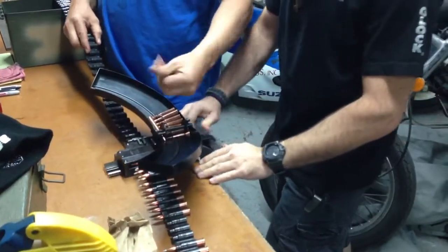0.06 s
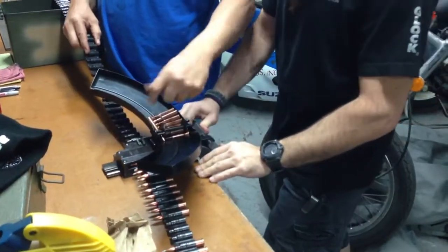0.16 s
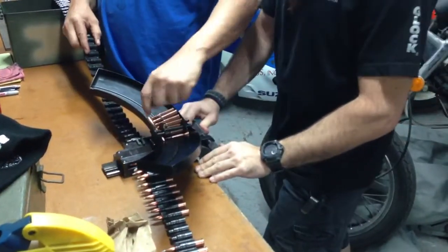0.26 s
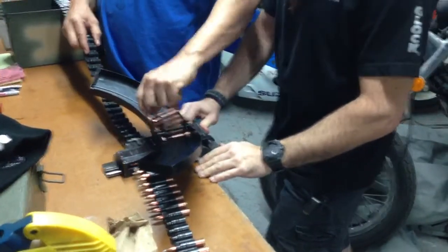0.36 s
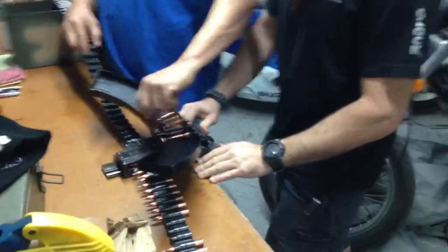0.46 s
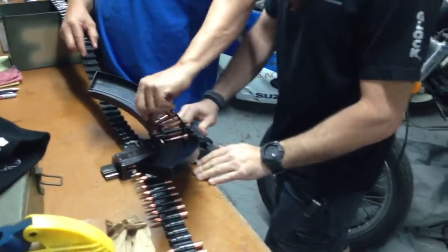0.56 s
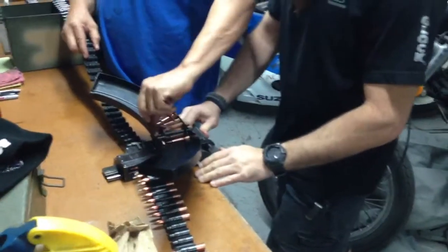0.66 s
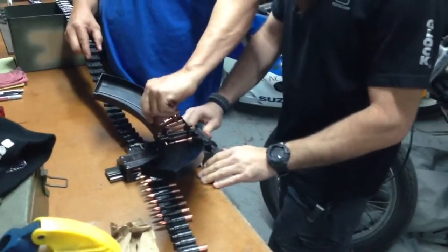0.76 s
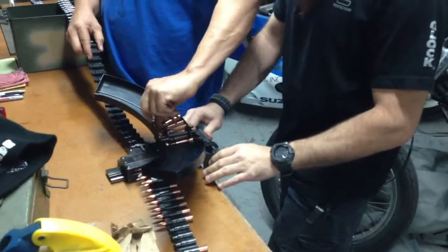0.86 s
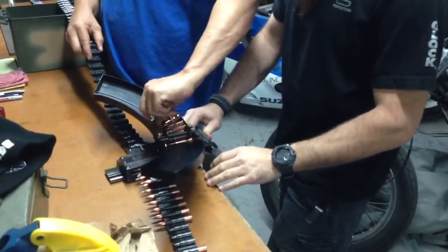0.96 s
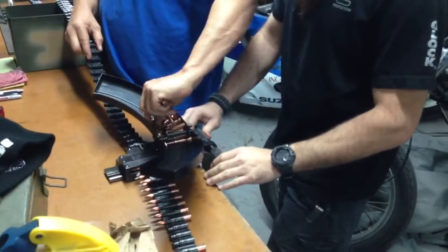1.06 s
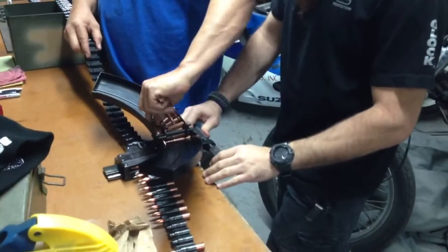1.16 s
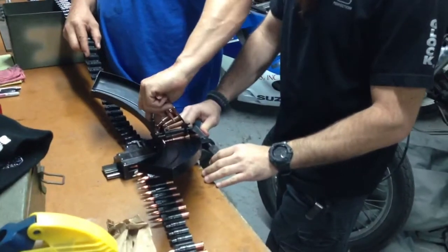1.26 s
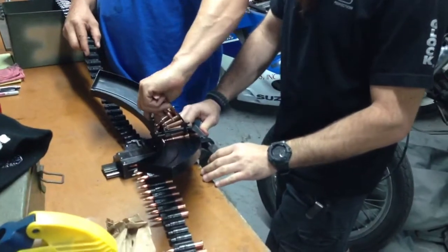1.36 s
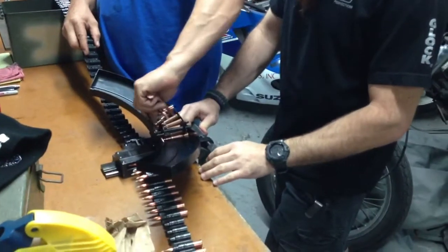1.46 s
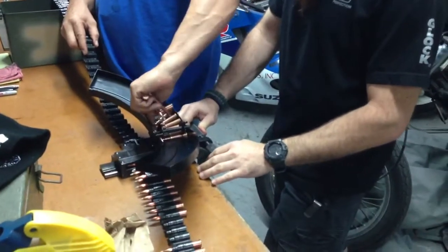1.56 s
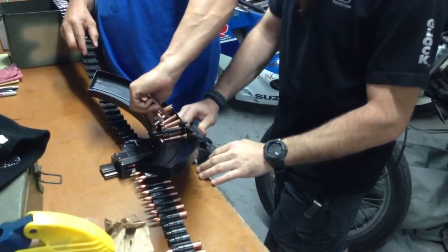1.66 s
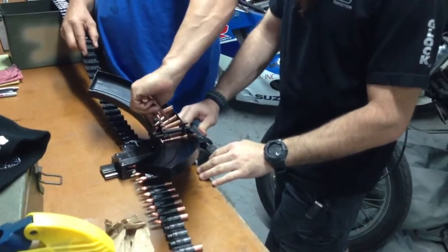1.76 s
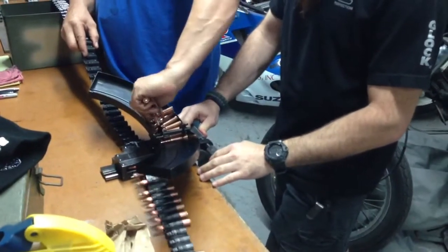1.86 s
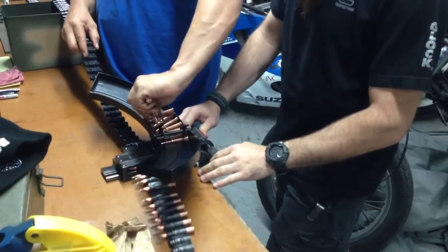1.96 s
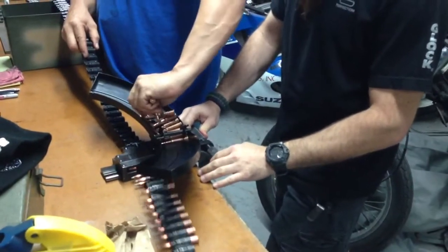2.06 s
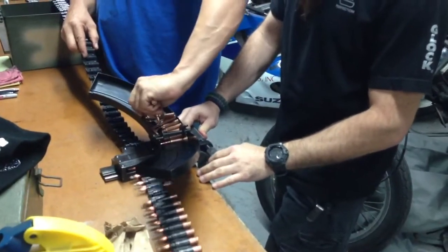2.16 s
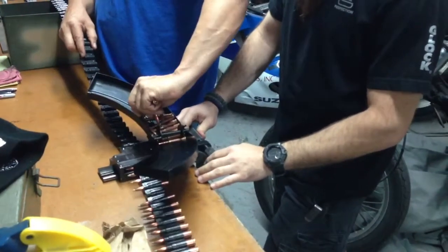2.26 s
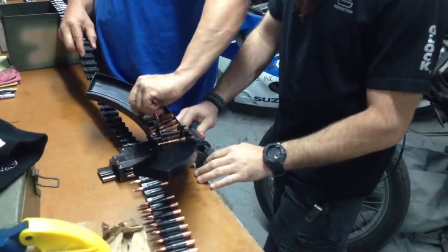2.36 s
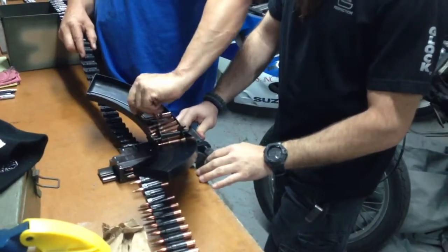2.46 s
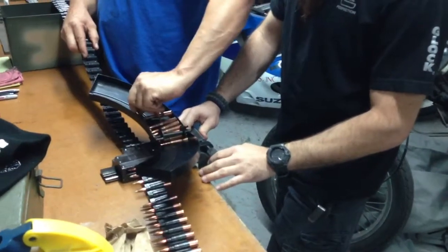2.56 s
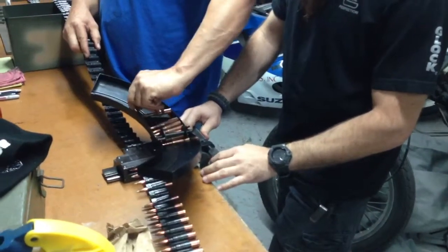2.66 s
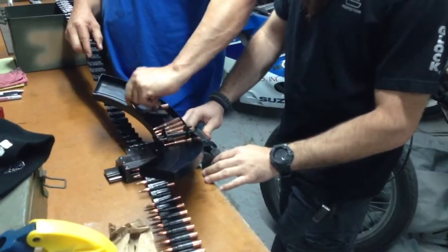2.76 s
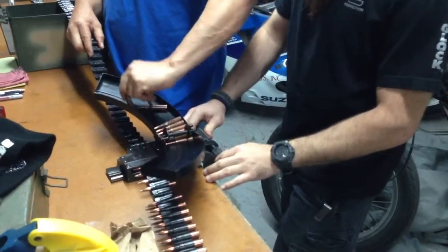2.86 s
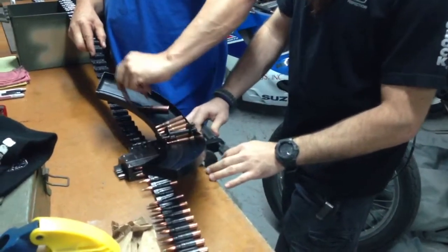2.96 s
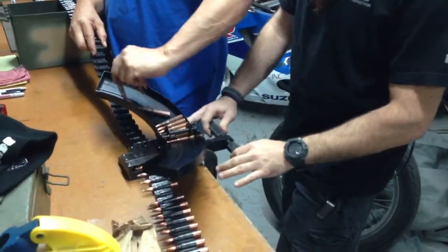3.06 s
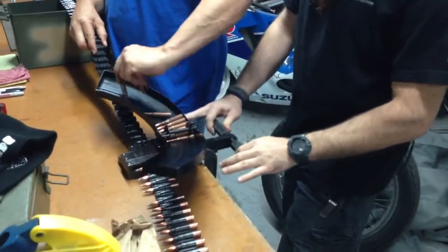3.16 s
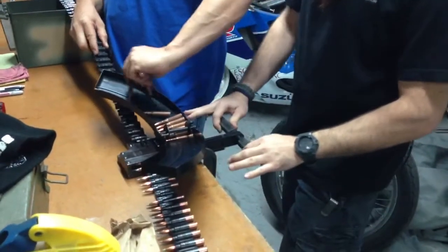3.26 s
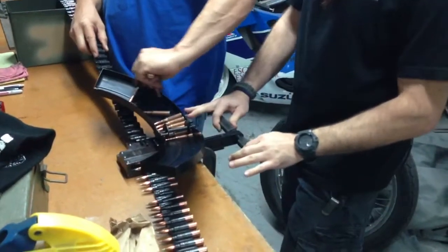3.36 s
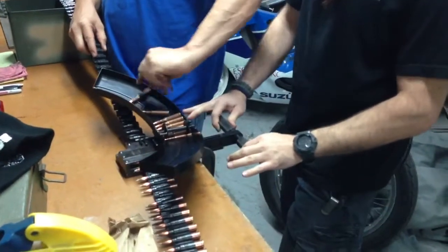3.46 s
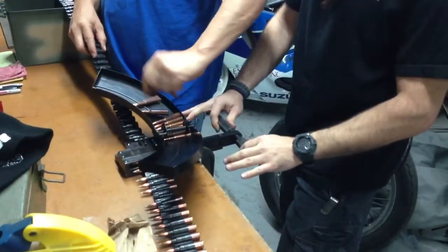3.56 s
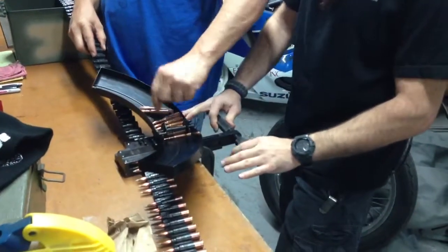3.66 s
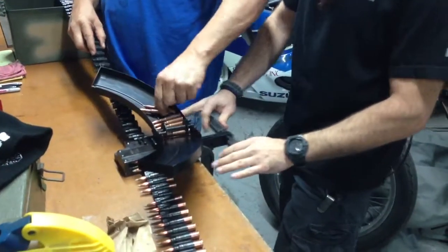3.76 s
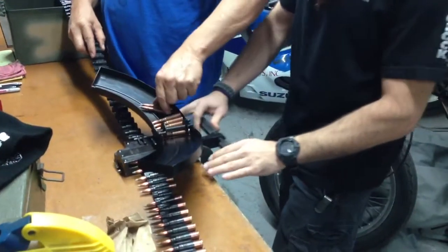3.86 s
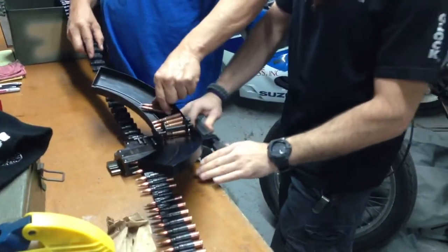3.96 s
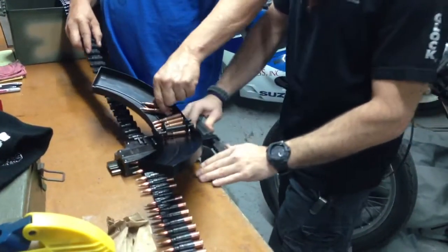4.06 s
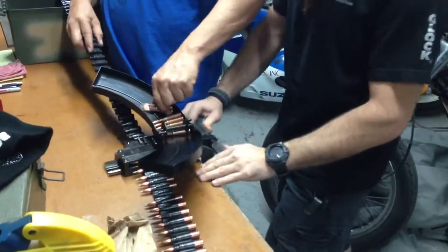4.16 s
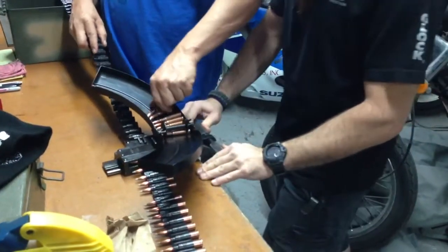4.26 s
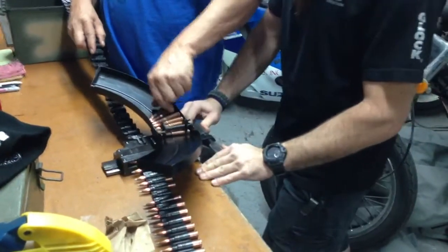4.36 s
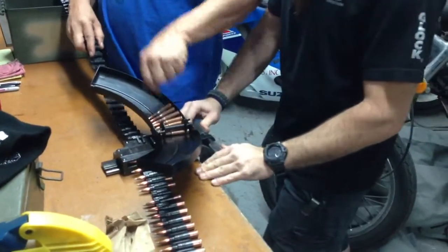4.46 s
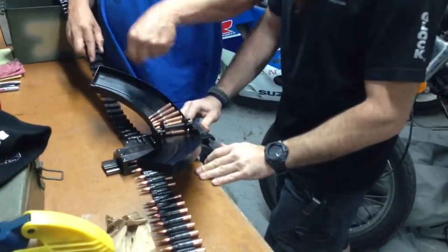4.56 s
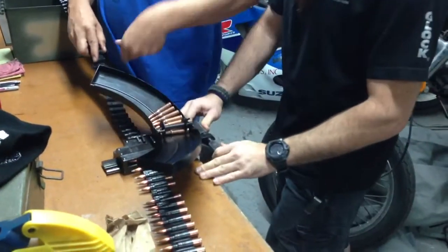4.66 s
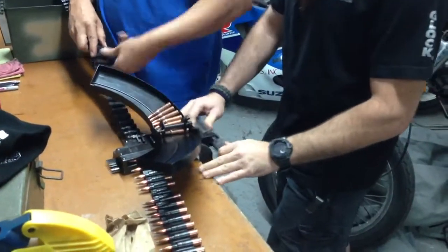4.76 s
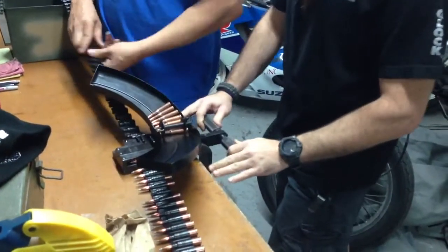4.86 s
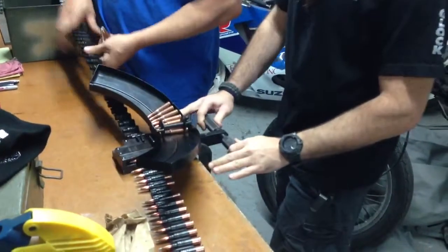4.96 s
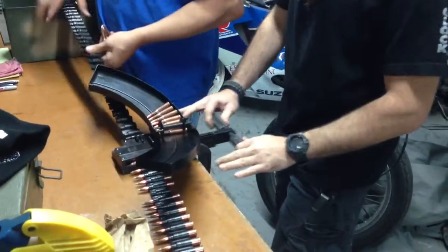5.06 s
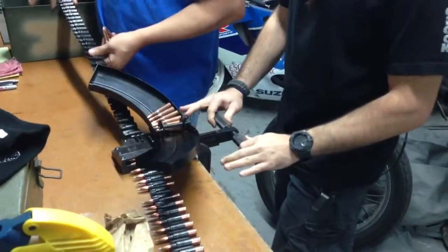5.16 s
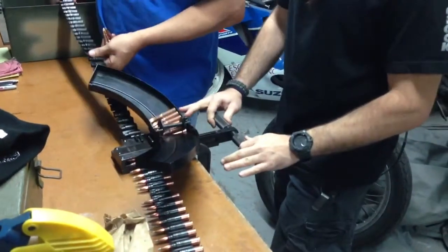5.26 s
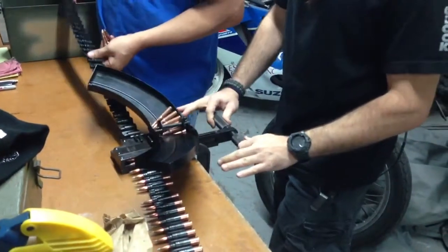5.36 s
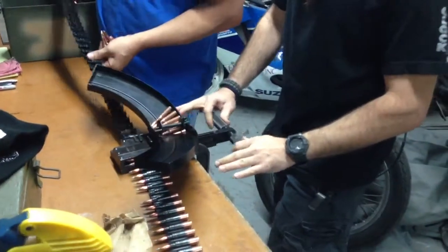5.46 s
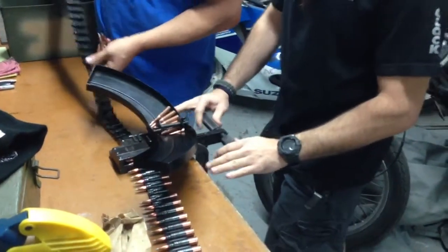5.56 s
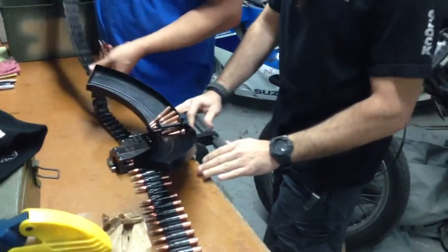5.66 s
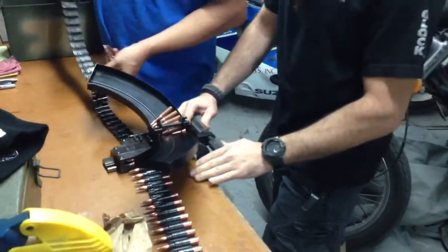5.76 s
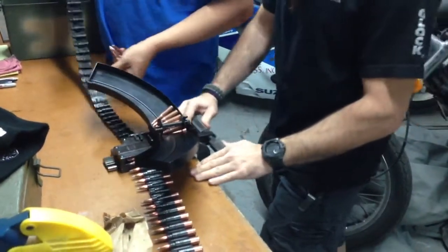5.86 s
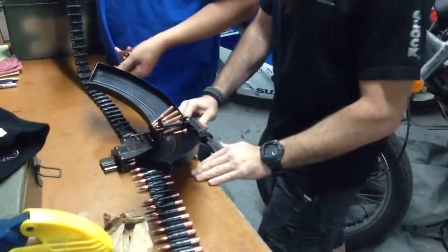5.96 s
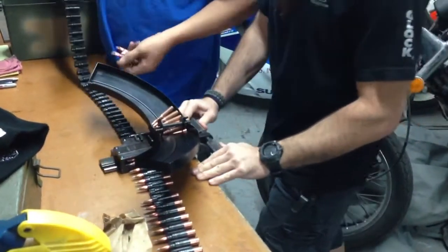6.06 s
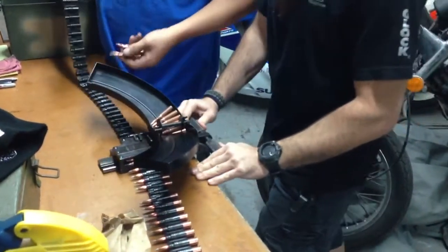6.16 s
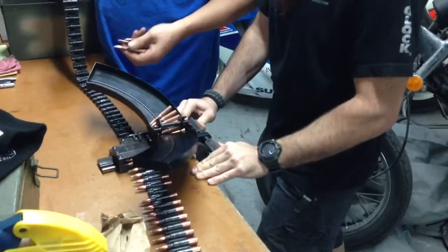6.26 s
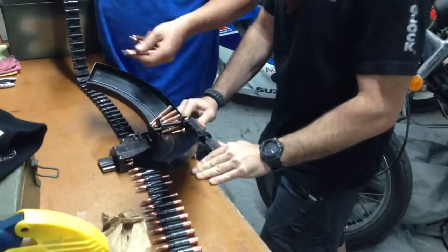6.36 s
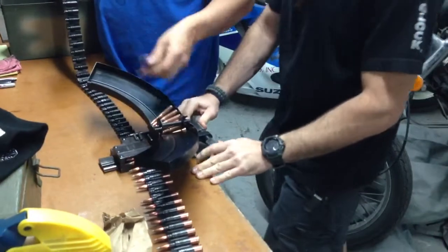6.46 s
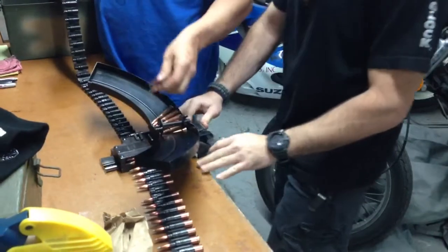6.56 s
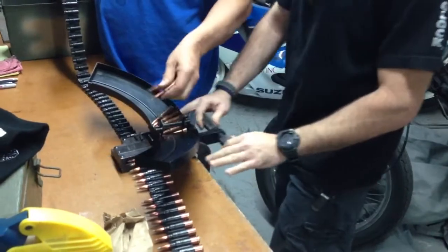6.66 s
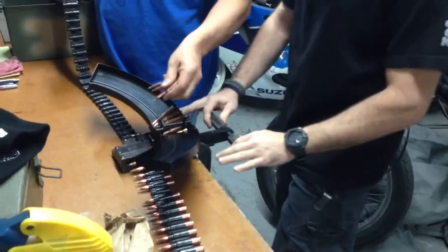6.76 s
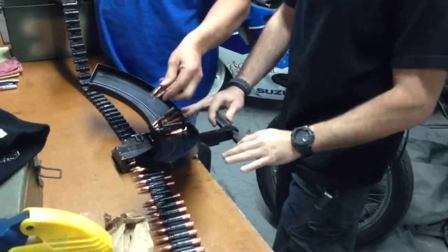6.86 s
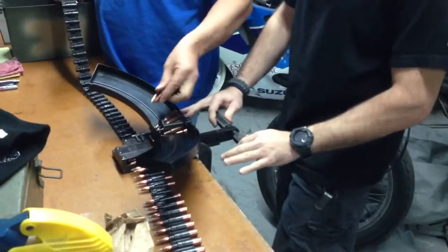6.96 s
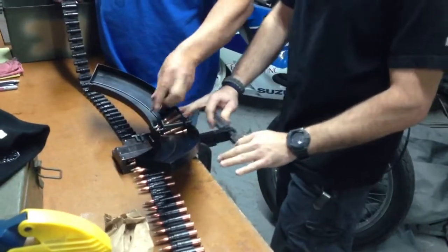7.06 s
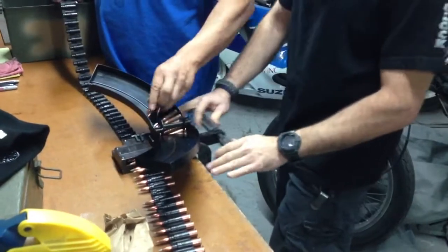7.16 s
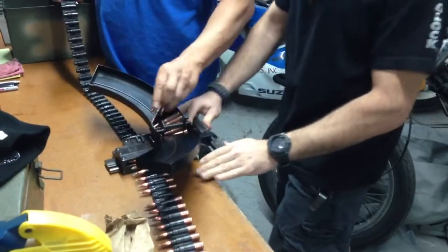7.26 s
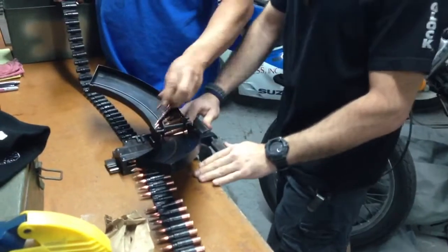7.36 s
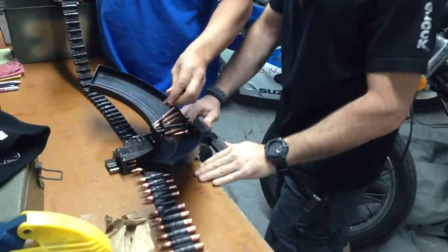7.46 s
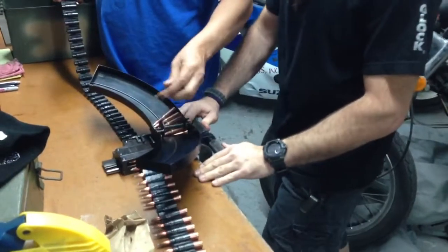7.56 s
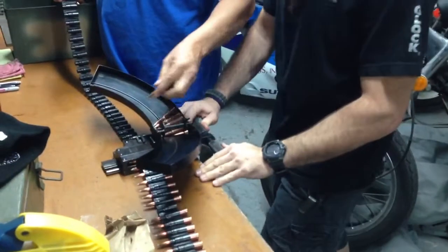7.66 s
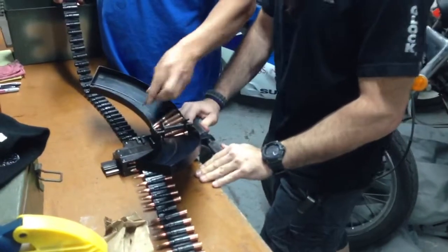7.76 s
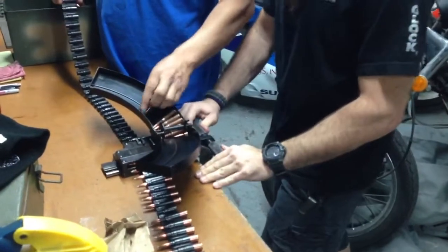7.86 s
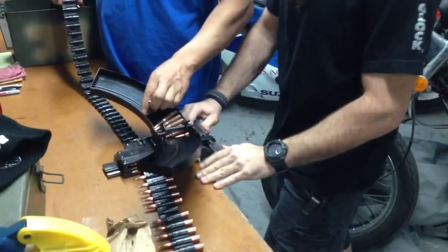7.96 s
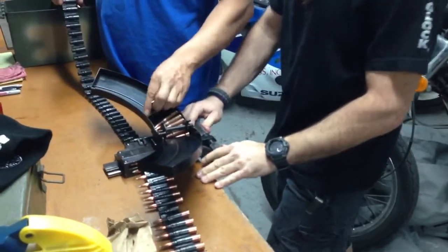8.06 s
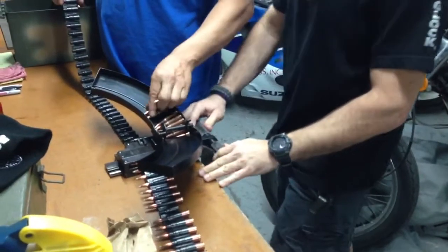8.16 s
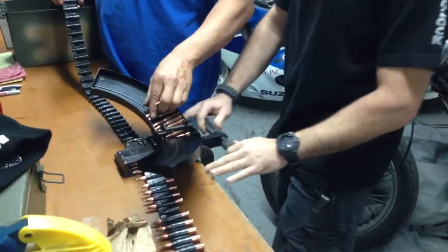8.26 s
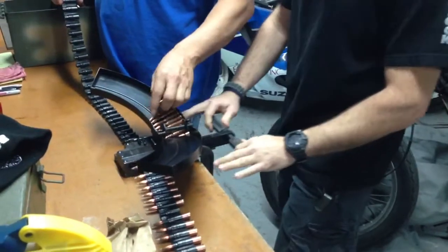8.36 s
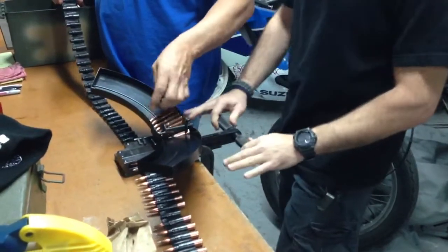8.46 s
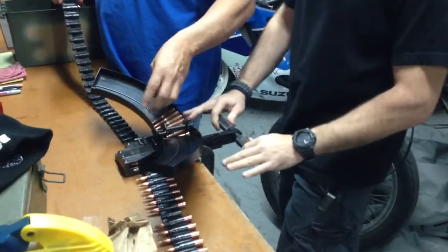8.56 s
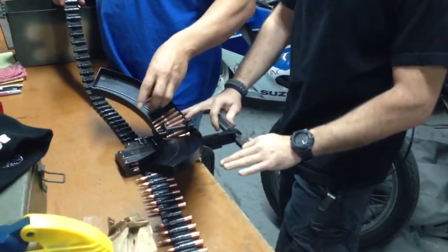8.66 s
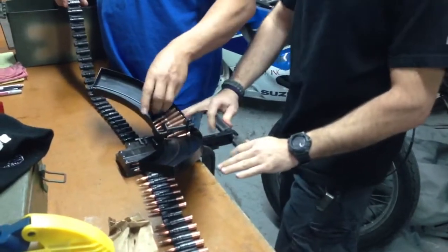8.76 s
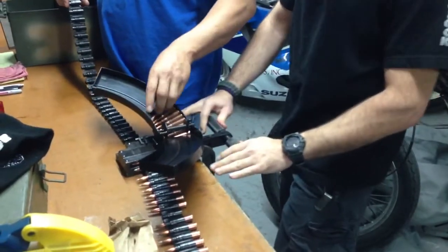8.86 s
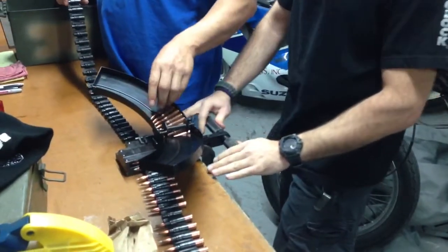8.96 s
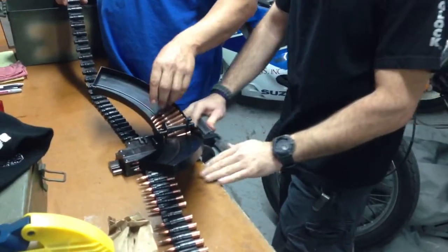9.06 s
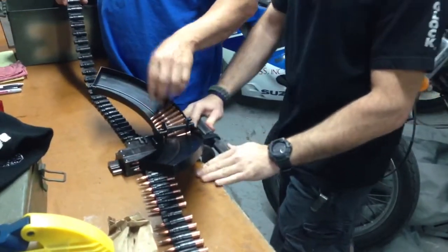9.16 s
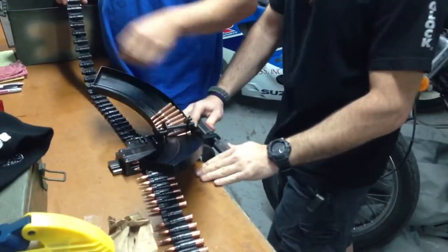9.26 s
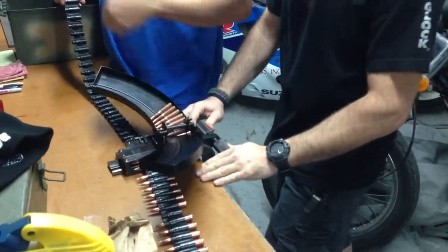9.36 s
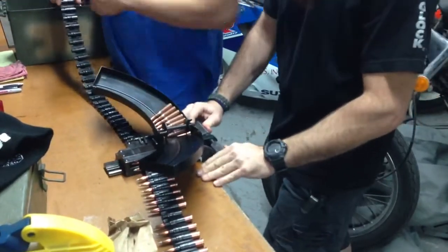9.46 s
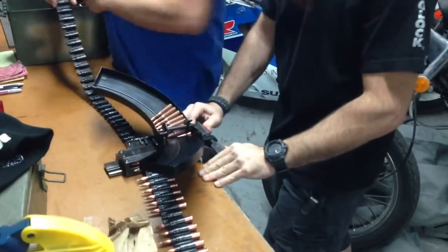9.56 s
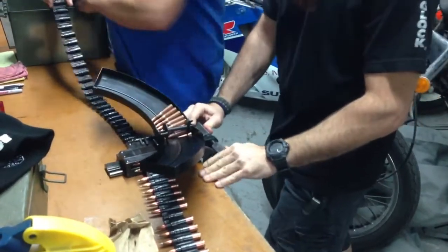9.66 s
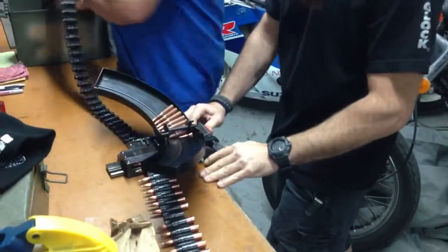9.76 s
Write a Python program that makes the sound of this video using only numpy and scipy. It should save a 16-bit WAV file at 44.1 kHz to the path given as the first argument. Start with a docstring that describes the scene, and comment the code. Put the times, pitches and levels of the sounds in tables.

```python
"""Faint brass clinks and light knocks over quiet workshop air, then a hand-cranked belt loader at work on a bench.
Cartridges drop into its steel tray, a pawl snaps, the crank knocks at its stop, cases clink and the belt drags.
Struck parts are decaying sines and noise through resonant bodies; the sliding belt is gritty noise and small ticks.
A hard-walled room answers in noise tails; the microphone signal loses its deep bass and has its peaks squeezed."""
import sys
import numpy as np
from scipy import signal
from scipy.fft import rfft, irfft, next_fast_len
from scipy.io import wavfile
from scipy.ndimage import map_coordinates

SR = 44100
rng = np.random.default_rng(int(sys.argv[2]) if len(sys.argv) > 2 else 0)


def transcribe(u):
    """Save the signal u as a 16-bit wav file named by the first command-line argument.

    u: samples, shape (n,) or (channels, n), limited to [-1, 1]; the rate is SR.
    q: integer samples, one column per channel.
    """
    v = np.clip(np.atleast_2d(u).T, -1, 1)
    q = np.round(v * 32767).astype(np.int16)
    wavfile.write(sys.argv[1], SR, q)


N = 431723  # length [samples]

# Modes of the wooden bench: (frequency [Hz], level [dB], t60 [s])
BENCH = [(174, -3.5, 0.054), (230.4, 0, 0.033), (292, 8, 0.012), (366, -3.5, 0.073), (461, -7, 0.08),
         (550, 0, 0.025), (671, 2, 0.031)]
# Modes of the loader housing: (frequency [Hz], level [dB], t60 [s])
HOUSING = [(1184, -0.5, 0.06), (1357, 0, 0.046), (1570, 3.5, 0.03), (1853, 3.5, 0.0081), (2128, 2, 0.052),
           (2534, 7.5, 0.02)]
# Modes of the steel tray: (frequency [Hz], level [dB], t60 [s])
TRAY = [(3622, -1, 0.04), (3874, 0, 0.034), (4130, 3, 0.012), (4454, 3, 0.039), (4866, -0.5, 0.022),
        (5860, -0.5, 0.053)]
# Highest modes of the tray: (frequency [Hz], level [dB], t60 [s])
TRAY_TOP = [(6600, 0.5, 0.038), (7230, -10.5, 0.039), (8100, -1.5, 0.027), (9620, -14, .02)]


def amp(db):
    """Decibels to gain."""
    return 10 ** (np.asarray(db) / 20)


def unit(x):
    """Scale to rms 1."""
    return x / np.sqrt(np.mean(x ** 2) + 1e-20)


def along(points, hz):
    """Interpolate (Hz, value) points on a log frequency axis."""
    f, v = np.transpose(points)
    return np.interp(np.log(hz + 1), np.log(f + 1), v)


def wobble(rate):
    """A smooth random curve with rate knots a second."""
    knots = rng.standard_normal(int(N * rate / SR) + 4)
    return map_coordinates(knots, [np.arange(N) * rate / SR])


def filtered(x, response):
    """Multiply the spectrum of x by a response of frequency."""
    m = next_fast_len(len(x) + SR // 2)
    return irfft(rfft(x, m) * response(np.fft.rfftfreq(m, 1 / SR)), m)[:len(x)]


def body(broad, modes, ring_db):
    """Causal impulse response, energy 1, of resonances standing on a broad spectrum."""
    size = 8192
    hz = np.fft.rfftfreq(size, 1 / SR)
    width = lambda t60: np.log(1000) / np.pi / t60  # a mode that dies fast is wide
    peaks = sum(amp(db) ** 2 / (1 + (2 * (hz - c) / width(t60)) ** 2) for c, db, t60 in modes)
    gain = amp(along(broad, hz)) * np.sqrt(1 + amp(ring_db) ** 2 * peaks)
    cepstrum = irfft(np.log(gain + 1e-6))
    cepstrum[1:size // 2] *= 2  # folding the cepstrum makes the phase minimal
    cepstrum[size // 2 + 1:] = 0
    h = irfft(np.exp(rfft(cepstrum)))[:size // 2]
    return h / np.linalg.norm(h)


def parts():
    """Impulse responses of the bench, housing, tray and tray top, which sound when struck or rubbed."""
    # Broad spectrum under the bench modes: (frequency [Hz], relative density [dB per Hz])
    bench_broad = [(90, -44.5), (160, 2.5), (250, 1.5), (450, 1.5), (700, -2), (1500, -45.5)]
    # Under the housing modes: (frequency [Hz], relative density [dB per Hz])
    housing_broad = [(350, -28), (900, -2), (1500, 0), (2200, -3), (3200, -10), (6000, -28)]
    # Under the tray modes: (frequency [Hz], relative density [dB per Hz])
    tray_broad = [(1500, -10.5), (3000, 8), (4500, 7.5), (5800, 6), (10000, -29.5)]
    # Under the highest tray modes: (frequency [Hz], relative density [dB per Hz])
    top_broad = [(3500, -24), (6800, 3), (10000, -4), (14500, -12), (16000, -42)]
    return [body(bench_broad, BENCH, ring_db=-14.0), body(housing_broad, HOUSING, ring_db=-1.5),
            body(tray_broad, TRAY, ring_db=0.0), body(top_broad, TRAY_TOP, ring_db=1.5)]


def workshop_air():
    """Steady noise shaped to the spectrum of the workshop background."""
    # Spectrum of the background: (frequency [Hz], relative density [dB per Hz])
    air_spectrum = [(15, -20.5), (25, 11), (64, 8), (180, 13), (354, 0.5), (624, 0.5), (1740, 1),
                    (5570, -5.5), (6210, -6.5), (14800, -13.5), (16000, -47)]
    noise = rng.standard_normal(N)
    return amp(-63.5) * unit(filtered(noise, lambda hz: amp(along(air_spectrum, hz))))


def room(x):
    """Each band of the walls' answer dies at its own speed; a fresh noise tail for every short stretch."""
    # Reverberation of the hard walls: (frequency [Hz], t60 [s])
    wall_decay = [(150, 0.1), (500, 0.99), (2000, 0.79), (6000, 0.51), (14000, 0.18)]
    hop = SR // 8
    out = np.zeros(N + 3 * SR)
    for k in range(0, N, hop):
        hz, t, z = signal.stft(rng.standard_normal(SR), SR, nperseg=256)
        fade = amp(-60 * t / along(wall_decay, hz)[:, None])
        tail = signal.istft(z * fade, SR, nperseg=256)[1]
        wet = signal.fftconvolve(x[k:k + hop], tail / np.linalg.norm(tail))
        out[k + 300:][:len(wet)] += wet  # the walls answer 300 samples late
    return out[:N]


def jingle():
    """The hanging belt is jolted: many links ring together in a few blurred bands that fade slowly."""
    # Jolts of the belt: (time [s], level [dB])
    jolts = [(5.945, -35)]
    # Bands of the ringing links: (frequency [Hz], width [Hz], level [dB])
    link_bands = [(1780, 380, 0), (2170, 120, -2), (2920, 260, -3), (3250, 350, -3), (4100, 700, -8)]
    t60_s = 0.95
    t = np.arange(N) / SR
    bands = lambda f: np.sqrt(sum(amp(db) ** 2 / (1 + (2 * (f - hz) / width) ** 4)
                                  for hz, width, db in link_bands))
    fade = sum((t > s) * amp(db - 60 * (t - s).clip(0) / t60_s) for s, db in jolts)
    flicker = amp(2.5 * wobble(40))
    return fade * flicker * unit(filtered(rng.standard_normal(N), bands))


def sliding():
    """Gain of each part over time: a slide rises up to its start, holds for its length and falls away."""
    # Belt and cartridges sliding:
    # (time [s], length [s], scrape level [dB], bench share [dB], hiss share [dB])
    slides = [(0, 0.031, -63, -8, 7.5), (0.73, 0.49, -64.5, -0.5, 0.5), (1.53, 0.04, -62, 8, -20),
              (1.68, .05, -62, 9.5, -20), (1.884, 0.069, -45.5, 5, -14), (1.99, 0.28, -40, 2, -14),
              (2.734, 0.42, -53.5, -11.5, 2), (3.058, 0.41, -43.5, -7, -7.5),
              (3.523, 0.18, -45.5, -16, -1.5), (3.744, 0.36, -51, -12, 3.5),
              (4.245, 0.018, -38.5, -19, -19), (4.3, 0.094, -44, -25, -9), (4.85, 0.068, -51, -6, -11.5),
              (5.152, 0.0065, -43.5, 9, -12), (5.193, 0.089, -40.5, -3, 4.5), (5.49, 0.11, -33, -16, -6),
              (5.606, 0.078, -30.5, -7, -4), (5.952, 0.048, -42, -8, -3), (6.11, 0.072, -60, -20, 0),
              (6.69, 0.24, -46, -6, -10.5), (6.914, 0.061, -35.5, -5.5, -0.5), (7.118, 0.28, -52, -9, 8.5),
              (7.355, 0.24, -51, 6, -6), (8.05, 0.26, -64, -42, 14), (8.338, 0.23, -45, -7.5, -1.5),
              (8.51, 0.16, -41.5, -4.5, -9.5), (8.77, 0.23, -45, -23.5, -1), (9.78, .05, -48.5, 1, 1)]
    # Small movements that never stop, one level per part, low to high: level [dB]
    rest_levels = [-69, -84.5, -74, -77.5]
    rise_db_per_s, fall_db_per_s = 219.5, 97.5
    t = np.arange(0, N, 64) / SR
    s, length, db, bench_db, hiss_db = np.transpose(slides)[:, :, None]
    shape_db = db - rise_db_per_s * (s - t).clip(0) - fall_db_per_s * (t - s - length).clip(0)
    top_db = -8.5 + 1.22 * hiss_db  # the top of the hiss follows the hiss share
    shares = [bench_db, 0, hiss_db, top_db]
    power = [amp(rest) ** 2 + (amp(shape_db + share) ** 2).sum(axis=0)
             for share, rest in zip(shares, rest_levels)]
    return [np.interp(np.arange(N) / SR, t, np.sqrt(p)) for p in power]


def ticks():
    """Single links knock while the belt moves: short sines, each with its own pitch, as loud as the scrape."""
    ticks_per_s, tick_db = 130, -2  # the level is relative to the scrape
    middle_hz, log_spread, cycles = 1923, 0.61, 13  # cycles to die away by 60 dB
    when, tone, size = rng.random((3, 2200))
    keep = np.arange(len(when)) < ticks_per_s * N / SR
    scatter = np.log(tone / (1 - tone)) / 2
    hz = (middle_hz * np.exp(log_spread * scatter)).clip(300, 9000)[:, None]
    t = np.arange(600) / SR
    level_db = (-5 * np.log(size)).clip(0, 12)[:, None]  # many faint, few strong
    wave = keep[:, None] * amp(level_db - 60 * t * hz / cycles) * np.sin(2 * np.pi * hz * t)
    where = (when * N).astype(int)[:, None] + np.arange(len(t))
    knocks = np.bincount(where.ravel(), wave.ravel(), minlength=N)[:N]
    return amp(tick_db) * sliding()[1] * unit(knocks)


def drag(bodies):
    """Links stick and slip over the bench: gritty force with many tiny knocks, fed into the parts."""
    # What a sliding belt excites in the bench: (frequency [Hz], relative density [dB per Hz])
    rub_broad = [(90, -39), (160, 2), (230, 0), (370, 0), (520, -6), (1200, -43)]
    # Bench modes under the sliding belt: (frequency [Hz], level [dB], t60 [s])
    rub_modes = [(176, -1.5, 0.033), (293, 2, .04), (360, 2, 0.073)]
    # Strength of slips over the grit, one per part, low to high; weakest in the bench: gain [ratio]
    knock_gains = [3, 9, 9, 9]
    # Unevenness of the grit, one per part, low to high: depth [dB]
    lump_depths = [1.4, 2.8, 2.8, 2.8]
    rubbed = [body(rub_broad, rub_modes, ring_db=6.5)] + bodies[1:]
    shared = wobble(60)
    rate = 320 * amp(3 * wobble(25))  # slips a second, in clusters
    out = np.zeros(N)
    for gain, size, lump_db, h in zip(sliding(), knock_gains, lump_depths, rubbed):
        knocks = (rng.random(N) < rate / SR) * amp(4 * rng.standard_normal(N).clip(-2, 2))
        lumps = amp(lump_db * (shared + wobble(45)))
        grit = rng.standard_normal(N) * lumps + size * knocks
        out += gain * unit(signal.fftconvolve(grit, h)[:N])
    return out


def clinks():
    """A case rings in a close, beating pair of wall modes with an overtone; touching neighbours shakes it."""
    # Brass cases striking each other: (time [s], level [dB], pitch [Hz], t60 [s])
    case_hits = [(0.0044, -42, 6250, 0.1), (0.052, -40, 6170, 0.08), (0.0824, -43, 6260, 0.08),
                 (0.1381, -38, 6100, 0.05), (0.166, -44, 6080, 0.05), (0.1955, -31, 6420, 0.057),
                 (0.211, -36, 6010, 0.05), (0.2674, -51, 6370, 0.05), (0.3721, -52, 6230, 0.05),
                 (1.918, -27, 6170, .035), (2.3845, -34, 6200, 0.039), (2.9706, -26.5, 6100, 0.042),
                 (3.014, -34, 6120, 0.05), (3.2815, -16.5, 6150, 0.033), (3.312, -16.5, 6130, 0.04),
                 (3.3601, -15, 6150, 0.048), (3.3748, -24, 6150, 0.06), (3.484, -28, 6000, 0.044),
                 (3.8523, -19, 5800, 0.046), (4.3076, -26.5, 6100, 0.039), (4.3723, -26, 6280, 0.036),
                 (4.4225, -30.5, 6150, 0.04), (5.225, -5, 6200, 0.1), (5.241, -15, 6190, 0.04),
                 (5.2539, -16, 6180, 0.05), (5.276, -14, 6200, 0.042), (5.3075, -12, 5900, .012),
                 (5.3108, -9, 6200, 0.039), (5.3234, -17, 6180, 0.05), (5.722, -12, 6180, 0.026),
                 (6.249, -32, 6200, 0.053), (6.336, -43, 6150, 0.05), (6.3704, -38.5, 6230, 0.045),
                 (6.48, -52, 6240, 0.046), (6.57, -40, 6200, 0.05), (6.62, -49, 6130, 0.038),
                 (6.6423, -33, 6300, 0.037), (6.8726, -11, 5970, 0.05), (6.9123, -9.5, 6130, 0.061),
                 (6.9378, -15, 6190, 0.058), (6.9592, -17, 6120, 0.05), (6.981, -26, 6330, 0.044),
                 (6.993, -18, 6160, 0.059), (7.1167, -24, 6350, 0.055), (7.1566, -25, 6160, 0.058),
                 (7.224, -19, 5900, 0.05), (7.265, -19.5, 6100, 0.042), (8.2586, -20, 6210, 0.05),
                 (8.476, -19, 6000, 0.045), (8.499, -20, 6200, .03), (8.514, -11, 6180, 0.05),
                 (8.544, -15.5, 6190, 0.05), (8.5954, -16, 6220, 0.054), (8.9196, -15, 6210, 0.045),
                 (8.951, -23, 6060, 0.05), (9.0947, -24.5, 6200, 0.05)]
    shake_radians, shake_rate = 0.55, 250  # rate in knots a second
    rise_s, overtone = 0.00053, 1.98  # the overtone is a ratio to the case's pitch
    t = np.arange(SR // 3) / SR
    out = np.zeros(N + len(t))
    jostle = shake_radians * np.array([wobble(shake_rate), wobble(shake_rate)])
    jostle = np.pad(jostle, ((0, 0), (0, len(t))))
    for (s, db, hz, t60), chance in zip(case_hits, rng.random(len(case_hits))):
        k = round(s * SR)
        split = 30 + 90 * chance  # Hz between the pair
        a, b = jostle[:, k:k + len(t)]
        ring = np.sin(2 * np.pi * hz * t + a) + 0.37 * np.sin(2 * np.pi * (hz + split) * t + b)
        over = amp(-18.5 - 60 * t / 0.06) * np.sin(2 * np.pi * hz * overtone * t + a)
        envelope = amp(db - 2.0 - 60 * t / max(t60, .005)) * (1 - np.exp(-t / rise_s))
        out[k:k + len(t)] += envelope * (ring + over)
    return out[:N] * amp(2.5 * wobble(140))


def struck(events, modes):
    """One object struck many times; each blow varies its modes in strength and, slightly, in pitch."""
    t = np.arange(SR // 4) / SR
    out = np.zeros(N + len(t))
    hz, level, t60 = np.transpose(modes)[:, :, None]
    onset = 1 - np.exp(-t / 0.00073)
    for (s, db, tilt_db), (a, b) in zip(events, rng.standard_normal((len(events), 2, len(modes), 1))):
        tilt = tilt_db * np.log2(hz / 4000)
        gain = amp(db - 5 + level + tilt + 2.5 * a - 60 * t / t60)
        tones = gain * np.sin(2 * np.pi * hz * (1 + 0.0073 * b) * t)
        out[round(s * SR):][:len(t)] += onset * tones.sum(axis=0)
    return out[:N]


def notes():
    """Loose pieces add single short notes, each one decaying mode."""
    # Further clear notes at the contacts: (time [s], level [dB], pitch [Hz], t60 [s])
    clear_notes = [(2.104, -20, 2400, .02), (2.229, -11.5, 870, 0.02), (2.19, -15, 300, 0.043),
                   (2.231, -15.5, 350, .045), (2.336, -23, 366, 0.06), (7.27, -14, 2000, 0.027),
                   (7.273, -16, 2500, .02), (5.66, -13, 1150, .025), (5.3, -10, 3200, 0.028),
                   (2.229, -7, 3390, 0.016), (2.227, -16, 4200, 0.023), (3.194, -22, 4770, .02),
                   (3.35, -15.5, 594, 0.048), (3.719, -16, 1860, 0.019), (3.757, -19, 4400, .025),
                   (3.87, -22, 1360, .02), (3.937, -7, 9340, .015), (3.937, -6.5, 11900, 0.018),
                   (3.981, -6.5, 4900, 0.019), (4.253, -16, 4200, .02), (5.942, -8, 1834, 0.024),
                   (5.756, -14, 4900, .02), (2.229, -15, 4940, .012), (6.8, -16, 2700, .02),
                   (0.508, -32, 1330, .04), (0.53, -46, 1507, .45), (0.506, -33, 3480, .04),
                   (0.915, -46, 1507, .3), (8.779, -17, 4600, .05), (8.483, -14, 6840, .025),
                   (9.74, -22, 165, .09), (5.19, -20, 590, .06), (7.168, -20, 1250, 0.033),
                   (7.55, -24.5, 297, .05), (9.733, -15, 374, 0.062), (6.922, -13, 576, 0.046),
                   (6.94, -15, 706, 0.037), (7.22, -8.5, 1600, 0.025), (7.943, -11.5, 1820, 0.022),
                   (8.9, -19.5, 2900, .02), (7.2, -29.5, 327, 0.091), (8.778, -13.5, 1230, 0.032)]
    return sum(struck([(s, db, 0)], [(hz, 0, max(t60, .004))]) for s, db, hz, t60 in clear_notes)


def pawl_snaps():
    """The feed pawl snaps over and rings in its few short modes."""
    # Snaps of the pawl: (time [s], level [dB], tilt [dB per octave])
    snap_times = [(3.064, -9.5, 1.5), (3.083, -19.5, -10.5), (3.821, -18, -9), (4.242, -13.5, 9.5),
                  (4.865, -12, 2), (5.476, -27, 1), (6.695, -12, -5), (7.975, -8, -0.5), (8.315, -18, -2),
                  (9.773, -21, 6)]
    # Modes of the pawl: (frequency [Hz], level [dB], t60 [s])
    pawl_modes = [(1565, -1.5, 0.016), (2390, -12, 0.034), (3930, 0, 0.022), (4900, -4.5, 0.016)]
    return struck(snap_times, pawl_modes)


def cartridge_drops():
    """A cartridge lands in the tray and rings in its own modes."""
    # Landings in the tray: (time [s], level [dB], tilt [dB per octave])
    landings = [(0.46, -51, 11), (2.895, -8.5, 3.5), (3.487, -10.5, 6.5), (3.851, -16, 2), (5.755, -20, -9),
                (7.221, -5.5, -2), (7.983, -8, 1.5), (8.258, -13.5, 2.5), (8.822, -13.5, 9),
                (8.836, -9, -1), (8.919, -12, 1.5), (8.959, -17.5, -1)]
    # Modes of a cartridge: (frequency [Hz], level [dB], t60 [s])
    cartridge_modes = [(2500, -3.5, 0.032), (5165, -2.5, 0.034), (5930, -11.5, .025), (7070, -13.5, .025),
                       (7190, -9.5, 0.046), (7840, -6.5, 0.03), (9630, -10.5, 0.014)]
    return struck(landings, cartridge_modes)


def crank():
    """The crank reaches its stop: the clamped loader and bench ring as one, shaken by loose parts."""
    # The crank reaching its stop: (time [s], level [dB])
    stops = [(3.311, 0.5), (4.241, -8), (5.152, -2), (6.883, 1.5), (8.488, -1)]
    # Joint modes of loader and bench: (frequency [Hz], level [dB], t60 [s])
    crank_modes = [(221, -5.5, 0.073), (433, -1, 0.037), (521, 2.5, 0.02), (587, -9, 0.09),
                   (770, 6.5, 0.02), (1051, 11, 0.023), (1375, 4, 0.025), (1585, 7, 0.018),
                   (1753, 8.5, 0.022), (2157, 11, 0.024)]
    rise_s, rise_cycles = .0015, 2.53  # low modes take longer to build up
    shake_radians, varies_db = 0.35, 2  # each mode changes in strength from turn to turn
    t = np.arange(SR // 4) / SR
    out = np.zeros(N + len(t))
    for (s, db), chance in zip(stops, rng.standard_normal((len(stops), len(crank_modes), 2))):
        for (hz, level, t60), (a, b) in zip(crank_modes, chance):
            rise = (1 - np.exp(-t / (rise_s + rise_cycles / hz))) ** 2
            shake = shake_radians * map_coordinates(rng.standard_normal(200), [t * hz / 5])
            fall = amp(db - 6.5 + level + varies_db * a - 60 * t / t60)
            tone = np.sin(2 * np.pi * hz * (1 + 0.01 * b) * t + shake)
            out[round(s * SR):][:len(t)] += fall * rise * tone
    return out[:N]


def contacts(bodies):
    """Each contact is a blow that rings the modes anew, then a brief chatter of small rebounds."""
    # Contacts on bench, housing and tray: (time [s], level [dB], bench share [dB], bright share [dB],
    # own note [Hz], chatter t60 before each part's linger factor [s])
    blows = [(0.118, -34, -15, -23, 1600, 0.067), (0.137, -32.5, 2.5, -20, 1930, 0.045),
             (0.163, -37, -15, -19, 1370, 0.037), (0.194, -36, -26, -12.5, 2630, 0.086),
             (0.458, -39, -7, -12, 1410, 0.022), (0.506, -18, -47, -15.5, 2620, 0.048),
             (0.548, -24.5, -25, -17, 2650, 0.032), (0.724, -28, -37, -18, 3590, 0.028),
             (0.841, -26, -32, -16, 1730, 0.031), (0.898, -19.5, -42, -14, 5070, 0.025),
             (0.913, -27.5, -33, -23, 1104, 0.042), (0.98, -31, -33, -14, 1350, 0.035),
             (1.055, -28.5, -35, -10.5, 4700, 0.046), (1.086, -26, -30, -14.5, 2180, 0.069),
             (1.096, -21, -36, -23, 4340, 0.043), (1.174, -30.5, -31, -18.5, 1870, 0.035),
             (1.536, -33, -11.5, -25, 1280, 0.044), (1.588, -41, -16, -19, 1360, 0.043),
             (1.685, -40, -5, -30, 1820, 0.05), (1.771, -28.5, -7, -68, 2020, 0.016),
             (1.846, -26, -13, -24, 2660, 0.028), (1.862, -18, -30, -17, 1780, 0.035),
             (1.917, -22.5, -9, -17.5, 2260, 0.046), (1.986, -21.5, -6, -10, 1280, 0.03),
             (2.009, -32, -30, -6, 5000, .015), (2.032, -34, -30, -10, 5000, .015),
             (2.082, -22.5, -3, -15, 1690, 0.057), (2.103, -3, -14, -20.5, 2650, 0.01),
             (2.164, -19, -14, -27, 1510, 0.083), (2.183, -17, -8, -22.5, 2000, 0.05),
             (2.229, -8.5, -13.5, -25, 1133, 0.022), (2.336, -37, 0, -31, 1580, 0.054),
             (2.382, -31, -21, -17, 1230, 0.044), (2.435, -24.5, -38, -21, 1630, 0.037),
             (2.484, -37, -29, -4, 1880, 0.031), (2.527, -17.5, -33, -19, 4380, 0.059),
             (2.541, -16.5, -46, -20.5, 2684, 0.044), (2.681, -38, -23, -10, 1950, 0.066),
             (2.699, -22.5, -29, -14, 4880, 0.035), (2.823, -24.5, -25, -24, 3750, 0.035),
             (2.842, -28.5, -35, -24.5, 2090, 0.063), (2.895, -8, -63, -5, 5210, 0.033),
             (3.064, -8.5, -27.5, -13.5, 1610, 0.029), (3.083, -13.5, -12, -23.5, 1410, 0.043),
             (3.151, -17, -19.5, -18.5, 1500, 0.054), (3.195, -9, -39, -14.5, 3600, 0.024),
             (3.231, -10.5, -16, -20, 1470, 0.032), (3.281, -13.5, -47.5, -17, 4900, 0.037),
             (3.312, -0.5, -13.5, -23, 2033, 0.034), (3.358, -24, -1.5, -12, 1130, 0.04),
             (3.465, -16, -17.5, -28, 1800, 0.064), (3.487, -10.5, -32, -5, 5240, 0.029),
             (3.699, -22, -55, -7.5, 4640, 0.087), (3.719, -13, -53, -14.5, 4400, 0.063),
             (3.757, -11, -58, -15, 5020, 0.036), (3.801, -17, -33, -18, 1870, 0.052),
             (3.821, -11, -19, -19, 1290, 0.033), (3.851, -7.5, -44, -11.5, 2360, 0.028),
             (3.87, -10, -28, -12.5, 1970, 0.029), (3.937, -10, -24, -10.5, 4100, 0.027),
             (3.981, -9.5, -19.5, -6, 4460, 0.027), (4.115, -15.5, -30, -15.5, 3780, 0.031),
             (4.198, -17, -42, -13, 3900, 0.06), (4.207, -13, -48.5, -16.5, 2236, 0.17),
             (4.242, -10, -21, -25.5, 1510, 0.058), (4.253, -6.5, -9.5, -15, 3750, 0.035),
             (4.283, -21.5, -18.5, -14, 1710, 0.022), (4.369, -25, -9.5, -12.5, 1490, 0.032),
             (4.422, -29, -19, -40.5, 1390, 0.034), (4.726, -37.5, -12, -26, 1930, 0.052),
             (4.812, -26, -13.5, -46, 1500, 0.047), (4.865, -9.5, -15.5, -19, 4230, 0.058),
             (5.068, -24, -4.5, -32, 3080, 0.03), (5.136, -25, -10, -31, 1500, 0.06),
             (5.153, -3, -8.5, -21.5, 2160, 0.041), (5.225, -26, -43, -29, 5500, 0.019),
             (5.242, -19.5, -16, -3.5, 1970, 0.045), (5.308, -16.5, -34, -5.5, 1284, 0.085),
             (5.338, -16, -17.5, -8.5, 4130, 0.053), (5.454, -25, -2.5, -33, 2000, 0.056),
             (5.476, -10, -19, -5, 1510, 0.022), (5.511, -18.5, -6.5, -39, 1160, 0.09),
             (5.553, -21.5, -20, -8.5, 4600, .02), (5.617, -17.5, -8.5, -19, 1980, 0.06),
             (5.645, -15.5, -6, -15, 2200, 0.04), (5.66, -19.5, -5, -17, 1180, 0.055),
             (5.683, -25, -15, -11, 1300, .025), (5.756, -10, -18, -5.5, 5020, 0.024),
             (5.766, -13, -25, -10, 4500, .03), (5.825, -13.5, -17.5, -24, 1960, 0.033),
             (5.941, -0.5, -22, -20.5, 3370, 0.022), (6.017, -22, -28, -31, 3190, 0.033),
             (6.04, -17.5, -19, -30, 2000, 0.031), (6.249, -38, -40, -13, 1840, 0.035),
             (6.369, -42, -29.5, -14, 1860, 0.035), (6.618, -38.5, -21, -16, 1440, 0.026),
             (6.642, -22, -25, -17, 4400, 0.031), (6.695, -9.5, -19.5, -16.5, 4040, 0.04),
             (6.805, -25, -30, -18.5, 1580, 0.058), (6.877, -1, -25, -10.5, 2260, 0.044),
             (6.884, -1, -13.5, -24, 2240, 0.041), (6.914, -14, -11, -21.5, 1700, 0.019),
             (6.94, -27.5, -13, 7.5, 2130, 0.043), (6.985, -14, -33, -12, 4080, 0.055),
             (7.115, -16, -14.5, -22, 2320, 0.033), (7.14, -21, -30, -16, 4270, 0.11),
             (7.168, -16, -30, -16.5, 1715, 0.11), (7.196, -7.5, -34, -24, 1180, 0.027),
             (7.221, -3.5, -55.5, -10.5, 2590, 0.029), (7.258, -15.5, -27, -14, 2110, 0.075),
             (7.288, -14, -16, -7, 4470, 0.033), (7.302, -20, -23, -7, 4000, .03),
             (7.424, -19.5, -39, -20.5, 4940, 0.054), (7.452, -22, -39, -15, 4200, .03),
             (7.483, -24.5, -30, -29, 1430, 0.045), (7.539, -26, -11, -22, 2680, 0.027),
             (7.608, -26.5, -5.5, -29, 800, 0.044), (7.626, -31, -20, -15, 4500, .02),
             (7.886, -27, -52, -22.5, 1470, 0.074), (7.922, -19, -53, -16, 5200, 0.038),
             (7.942, -7, -30.5, -15.5, 1190, 0.03), (7.974, -10.5, -41, -11.5, 1560, 0.019),
             (7.983, -8.5, -68, -5, 5250, 0.024), (8.005, -20, -45, -20, 1800, 0.025),
             (8.116, -27.5, -45, -18.5, 2130, 0.047), (8.188, -29.5, -49, -10, 3080, 0.04),
             (8.216, -21, -52, -15.5, 2500, 0.057), (8.24, -15.5, -42.5, -26, 1790, 0.03),
             (8.258, -13.5, -57, -8.5, 5320, 0.044), (8.315, -16.5, -27.5, -19, 1480, 0.076),
             (8.388, -16, -30.5, -22, 1520, 0.028), (8.421, -26.5, -7, -14, 1460, 0.033),
             (8.483, -4, -19, -15, 2090, 0.03), (8.514, -10, -6, -13, 1446, 0.033),
             (8.542, -22, -7, -2.5, 1960, 0.052), (8.575, -17, -24, -12, 1990, 0.079),
             (8.593, -14, -26, -11, 4100, 0.044), (8.762, -39, -40.5, -9, 5000, 0.026),
             (8.778, -9, -38, -9.5, 4700, 0.034), (8.822, 0, -57, -13, 4520, 0.033),
             (8.836, -9, -44, -11.5, 4430, 0.048), (8.919, -6, -53, -17.5, 4280, 0.038),
             (8.959, -10.5, -39, -16, 1523, 0.046), (8.998, -19.5, -49, -13.5, 2510, 0.035),
             (9.094, -17, -37, -9.5, 2250, 0.046), (9.123, -6.5, -16, -8, 4200, 0.023),
             (9.436, -27.5, -27, -28, 1480, 0.07), (9.453, -23.5, -16, -22, 1720, 0.043),
             (9.467, -23.5, -6.5, -15.5, 4750, 0.046), (9.489, -27, -7, -14, 4360, 0.023),
             (9.734, -16, -7.5, -26, 2250, 0.073), (9.773, -11.5, -5, -17, 1580, 0.043)]
    middling_db = -16  # bright share of a middling contact
    tray_note_hz, owner_db = 2800, 1.5  # notes from here up belong to the tray, below to the housing
    note_t60_s, note_shake = 0.075, 0.66  # longest note; radians of jostling
    blow_t60_s = 0.0024
    # One value per part, low to high
    chatter_db = np.array([-3.5, -8.0, -5.0, -2.5])
    ring_db = np.array([-7.5, -12, -9.0, -22])
    linger = np.array([2.69, 3.2, 2.06, 1.39])  # heavy parts keep moving longer
    soft_s = np.array([0.018, 0.0014, 0.0011, 0.00069])  # and start more slowly
    onset_s = np.array([[.006], [.0014], [.001], [.0006]])  # the ring builds up too

    t = np.arange(SR // 6) / SR
    force, rings = np.zeros((len(bodies), N + len(t))), np.zeros(N + len(t))
    # The first touch stands over the chatter
    first_touch = amp(np.array([[-20], [-3], [4], [5]]) - 60 * t / blow_t60_s)
    swell = 1 - np.exp(-t / soft_s[:, None])

    modes = [BENCH, HOUSING, TRAY, TRAY_TOP]
    part = np.repeat(np.arange(len(modes)), [len(m) for m in modes])
    hz, mode_db, mode_t60 = np.concatenate(modes).T[:, :, None]
    grips = 1 + .04 * rng.standard_normal((8, len(part), 1))  # how the parts are held shifts the modes
    mode_rise = 1 - np.exp(-t / onset_s[part])
    banks = amp(mode_db - 60 * t / mode_t60) * np.sin(2 * np.pi * hz * grips * t) * mode_rise

    spots = rng.standard_normal((len(blows), len(part)))  # where the blow lands sets each mode's strength
    noise = rng.standard_normal((len(blows), len(bodies), len(t)), dtype=np.float32)
    held = rng.integers(len(banks), size=len(blows))
    shake = np.pad(note_shake * wobble(250), (0, len(t)))
    lumps = amp(3.5 * wobble(300))  # rebounds come in lumps
    for (s, db, bench_db, bright_db, note_hz, t60), chatter, spot, grip in zip(blows, noise, spots, held):
        k = round(s * SR)
        brighter_db = bright_db - middling_db  # a bright contact is on the tray, a dull one on the housing
        housing_db = -14 - 0.19 * brighter_db
        tray_db = -12.5 + 0.23 * brighter_db
        level_db = db + np.array([bench_db, housing_db, tray_db, bright_db])
        owner = 1 if note_hz < tray_note_hz else 2
        level_db[owner] += owner_db  # the note's owner sounds louder

        fall = amp(-60 * (t / (max(t60, .004) * linger[:, None])) ** 1.13)
        chatter_gain = amp(level_db + chatter_db)[:, None]
        force[:, k:k + len(t)] += chatter_gain * swell * (fall + first_touch) * chatter

        signs = np.sign(spot[::-1])
        strength = amp((level_db + ring_db)[part] + 5.2 * spot.clip(-2, 1.2)) * signs
        rings[k:k + len(t)] += np.sqrt(fall[0]) * (strength @ banks[grip])

        # The struck piece adds a short note of its own
        note_fall = amp(level_db[owner] - 6 - 60 * t / min(1.9 * t60, note_t60_s))
        note = np.sin(2 * np.pi * note_hz * t + shake[k:k + len(t)])
        rings[k:k + len(t)] += swell[owner] * note_fall * note
    hits = sum(signal.fftconvolve(f[:N] * lumps, h)[:N] for f, h in zip(force, bodies))
    return rings[:N], hits


def scene():
    """Loader, belt, room and background; the clear struck tones stay close and reach the walls least."""
    bodies = parts()
    air = workshop_air()
    slide = drag(bodies) + ticks() + jingle()
    ring = clinks()
    modes, hits = contacts(bodies)
    tones = modes + crank() + cartridge_drops() + pawl_snaps() + notes()
    to_walls = amp(-11.0) * hits + amp(-14.5) * tones + amp(-10.5) * ring + amp(-12.5) * slide
    return (hits + tones + ring + slide + room(to_walls) + air)[None]


def record(dry):
    """Loud peaks are squeezed, the deep bass is dropped, and a steep edge cuts the top."""
    corner_hz, top_hz = 115, 15600
    bass = lambda hz: (1j * hz / corner_hz) ** 2 / (1 + 1.3j * hz / corner_hz - (hz / corner_hz) ** 2)
    edge = lambda hz: 1 / (1 + (hz / top_hz) ** 90)
    squeezed = dry[0] / (1 + np.abs(dry[0] / 0.7) ** 4) ** (1 / 4)
    return filtered(squeezed, lambda hz: bass(hz) ** 2 * edge(hz))[None]


dry = scene()
out = record(dry)
transcribe(out)
```